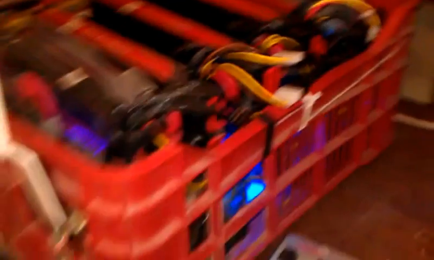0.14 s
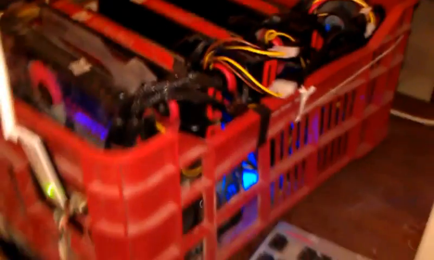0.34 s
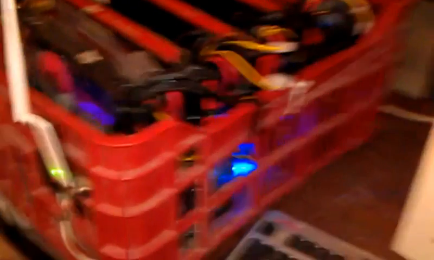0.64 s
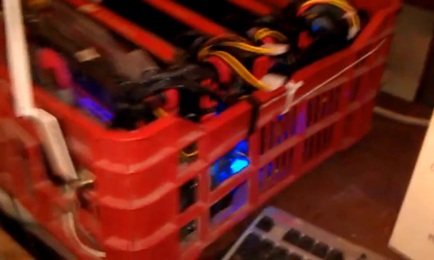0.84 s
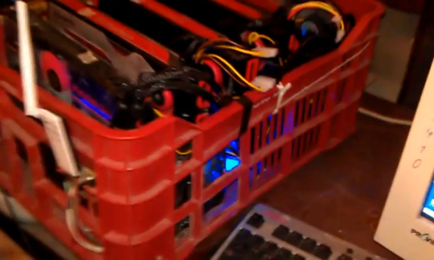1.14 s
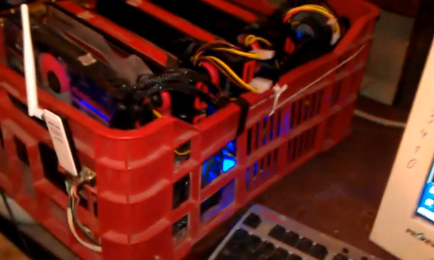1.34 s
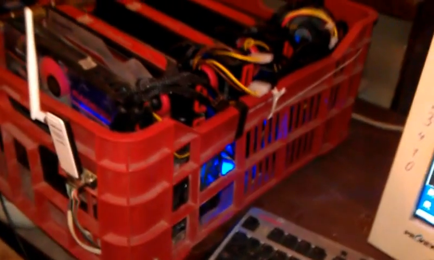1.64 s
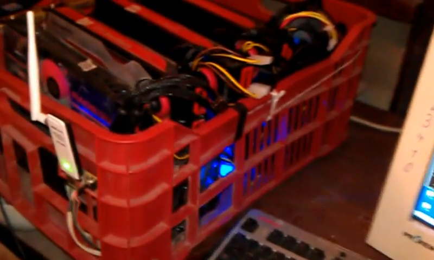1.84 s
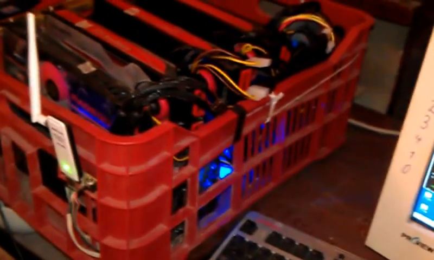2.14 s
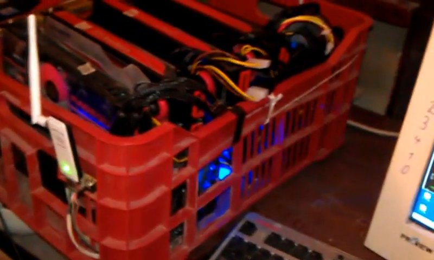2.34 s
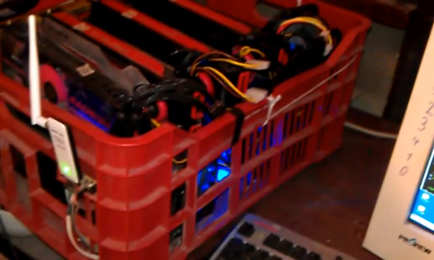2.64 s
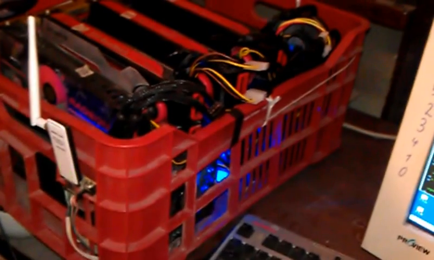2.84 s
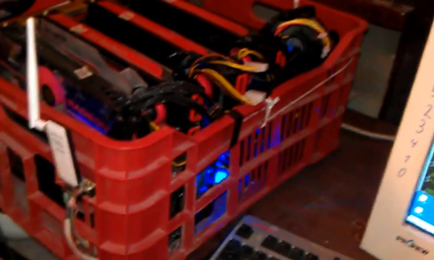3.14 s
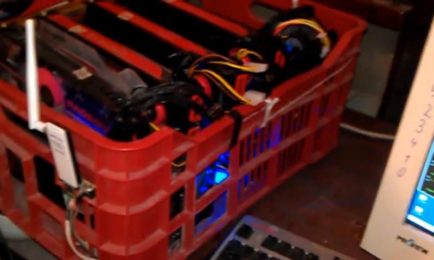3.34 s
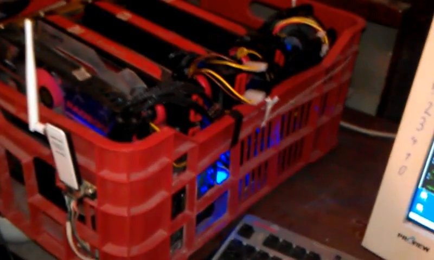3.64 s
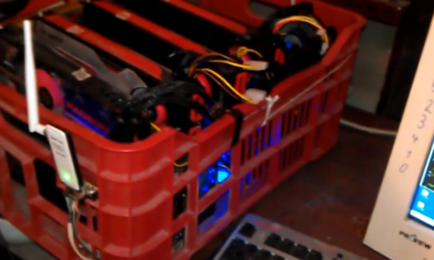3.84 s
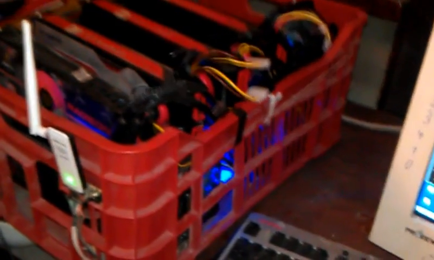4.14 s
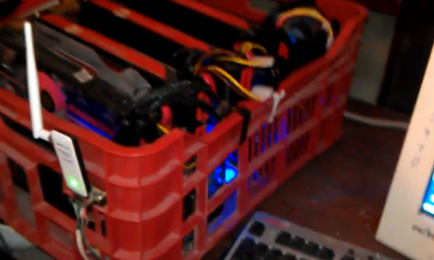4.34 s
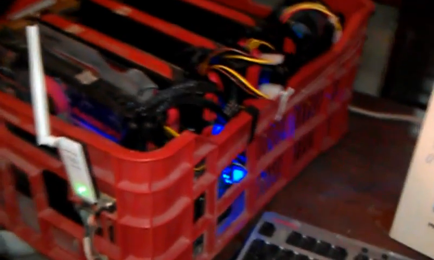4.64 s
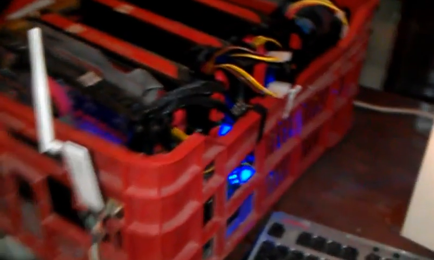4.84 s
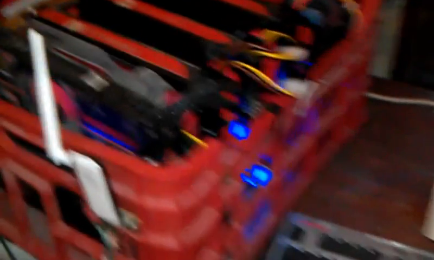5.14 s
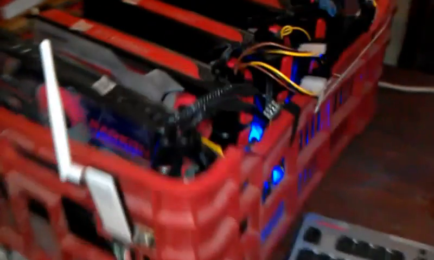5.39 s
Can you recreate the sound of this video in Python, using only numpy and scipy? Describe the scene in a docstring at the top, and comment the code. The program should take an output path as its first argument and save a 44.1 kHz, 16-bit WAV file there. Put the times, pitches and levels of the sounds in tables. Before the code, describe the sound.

A steady rush of computer fans with a faint hum, joined by a few brief handling scuffs and soft bumps.

```python
"""Small cooling fans blow flat out in an open plastic crate, heard on a hand-held camera's mono
microphone, its port ringing near 8.5 kHz. Close up at first, turbulent air makes an even whoosh over
faint wavering tones of blades and bearings, while the hand scuffs and bumps the camera body. By 1.5 s
the microphone is held back; from 3 s it turns and the whoosh changes colour. The hand scuffs and bumps
again at 4.6 s and brushes the body once more near the end."""
import sys
import numpy as np
from scipy import signal
from scipy.fft import rfft, irfft, next_fast_len
from scipy.io import wavfile
from scipy.ndimage import uniform_filter1d

SR = 44100
rng = np.random.default_rng(int(sys.argv[2]) if len(sys.argv) > 2 else 0)


def store_wav(level_fs):
    """Save 16-bit WAV to argv[1]."""
    pcm = np.round(np.clip(np.atleast_2d(level_fs), -1, 1) * 32767)
    wavfile.write(sys.argv[1], SR, pcm.T.astype(np.int16))


N = 243431


def gain_of(db):
    """Decibels to amplitude."""
    return 10 ** (np.asarray(db) / 20)


def unit_rms(x):
    """Scales to rms 1."""
    return x / np.sqrt(np.mean(x ** 2) + 1e-20)


def spectrum_at(hz, points_hz, values):
    """Interpolates a spectrum on a log-frequency axis."""
    return np.interp(np.log(hz + 1), np.log(np.asarray(points_hz) + 1), values)


def coloured(x, points):
    """Filters a sound by points of (frequency_hz, gain_db)."""
    size = next_fast_len(len(x))
    gain_db = spectrum_at(np.fft.rfftfreq(size, 1 / SR), *np.transpose(points))
    return irfft(rfft(x, size) * gain_of(gain_db), size)[..., :N]


def drift(t, low_hz, top_hz):
    """Random wavering of rms 1 at rates between low_hz and top_hz."""
    hz = np.geomspace(low_hz, top_hz, 24)[:, None]
    waves = np.sin(2 * np.pi * (hz * t + rng.random(hz.shape)))
    return unit_rms((waves / np.sqrt(hz)).sum(0))


def wander(low_hz, top_hz):
    """A drift drawn out to every sample."""
    t = np.arange(0, N / SR + .01, .005)
    return np.interp(np.arange(N) / SR, t, drift(t, low_hz, top_hz))


def microphone_shares(t):
    """Shares of the three microphone places as the camera moves before the crate."""
    # camera path: time_s, place (0 close, 1 held back, 2 turned)
    path = [(0, 0.027), (1.5, 0.97), (3, 0.97), (4.6, 1.32), (5.52, 1.78)]
    place = np.clip(np.interp(t, *np.transpose(path)), 0, 2)
    return np.maximum(1 - abs(place - np.arange(3)[:, None]), 0)


def whoosh():
    """Turbulent air from the fans; its colour follows the microphone's place."""
    # relative spectra shaped by crate and desk: frequency_hz, close_db, held_back_db, turned_db
    air_colour = [(40, -34, -32, -32), (100, -23, -21.5, -18), (190, -13, -17, -19), (224, -10, -13, -9.5),
                  (394, -1.5, -4, -5), (540, -8, -5, -9), (771, 8, 1.5, 7), (927, -11, -1, -3.5),
                  (1015, 3.5, -9.5, 2.5), (1200, 0, 0, 2.5), (1730, 4.5, -1, -1), (1900, 0.5, 0.5, -4),
                  (2710, -1.5, -5, -5), (4270, -7, -7.5, -7), (5400, -4.5, -7.5, -8)]
    frames, hz = N // 256 + 5, np.fft.rfftfreq(1024, 1 / SR)
    t = np.arange(frames) * 256 / SR
    points_hz, *places = np.transpose(air_colour)
    shape_db = np.transpose([spectrum_at(hz, points_hz, p) for p in places]) @ microphone_shares(t)
    real, imag, patches = rng.standard_normal((frames, 513, 3)).T
    patches = uniform_filter1d(patches, size=12, axis=0)  # smooth across frequency
    patches = unit_rms(uniform_filter1d(patches, size=12, axis=1))  # and across time
    gusts_db = .5 * drift(t, 2.5, 30.) * np.clip(hz / 5000, 0, 1)[:, None]  # eddies flicker together
    spectra = (real + 1j * imag) * gain_of(shape_db + 0.29 * patches + gusts_db)
    air = signal.istft(spectra, nperseg=1024, noverlap=768)[1][:N]
    return gain_of(-31) * unit_rms(air)


def blade_hums():
    """Each fan's blades pass at a nearly steady rate; the level wanders as when neighbours beat."""
    # blade-passing tones: pitch_hz, close_db, held_back_db, turned_db, wander_hz, wander_db
    hums = [(151, -69.5, -70.5, -69.5, .3, 3), (302, -53, -53.5, -52.5, 0.2, 0.5),
            (379.4, -58.5, -59, -67, 0.42, 3), (446.5, -47, -53, -45.5, .5, 1.5),
            (637, -59, -57.5, -49, 1.6, 1), (755, -48.5, -56, -61, 5.6, 3.5)]
    out, shares = np.zeros(N), microphone_shares(np.arange(N) / SR)
    for pitch_hz, *places_db, wander_hz, wander_db in hums:
        cycles = np.cumsum(pitch_hz + wander_hz * wander(1.5, 15.)) / SR + rng.random()
        level_db = places_db @ shares + wander_db * wander(2.5, 15.)
        out += np.sqrt(2) * gain_of(level_db) * np.sin(2 * np.pi * cycles)
    return out


def bearing_whines():
    """Thin wavering tones that come and go, each sinking slowly as its fan settles."""
    # bearing tones: start_hz, slide_hz_per_s
    pitches = [(3554, -3.6), (3454, -.5), (1875, -.5)]
    # each whine's level at the moving microphone, one curve each: time_s, level_db
    curves = [
        [(0, -55), (.62, -46.5), (.85, -63), (1.1, -56), (1.9, -62), (2.4, -56), (3.9, -56), (4.65, -51.5),
         (4.8, -66)],
        [(0, -66), (.7, -50), (1, -54), (1.3, -54), (2, -64), (4.1, -64), (4.5, -63), (5.52, -64)],
        [(0, -60), (2, -62), (2.6, -50), (3.4, -59), (4.1, -49), (4.45, -51), (4.7, -62)],
    ]
    t, out = np.arange(N) / SR, np.zeros(N)
    for (start_hz, slide_hz_per_s), curve in zip(pitches, curves):
        cycles = np.cumsum(start_hz + slide_hz_per_s * t + 3. * wander(1.5, 25.3)) / SR
        level_db = np.interp(t, *np.transpose(curve)) + 3.2 * wander(3., 25.)
        out += np.sqrt(2) * gain_of(level_db) * np.sin(2 * np.pi * cycles)
    return out


def skin_scuffs():
    """Skin slips densely and unevenly over the plastic body; each stroke swells and eases off."""
    # strokes of the hand: middle_s, length_s, level_db
    strokes = [(0, .2, -29), (0.27, 0.25, -22), (.63, .2, -25), (0.798, 0.14, -28), (4.615, 0.085, -23.5),
               (5.325, .18, -29.5)]
    # spectrum of the rubbing: frequency_hz, gain_db
    rub_colour = [(800, -28), (2200, 0.5), (4500, -12), (6000, -0.5), (7000, -5), (11000, -3.5), (15500, 7)]
    ends_db, flatness = -15.5, 2.5  # a stroke's ends against its middle; power that flattens its top
    t = np.arange(N) / SR
    slip_db = 0.79 * np.minimum(rng.exponential(1, N // 64 + 1), 3)
    slips = rng.standard_normal(N) * gain_of(np.repeat(slip_db, 64)[:N])
    pressure = sum(gain_of(level_db + ends_db * abs(2 * (t - middle_s) / length_s) ** flatness)
                   for middle_s, length_s, level_db in strokes)
    return pressure * unit_rms(coloured(slips, rub_colour))


def fingertip_ticks():
    """Sharp ticks within the scuffs that die in milliseconds."""
    # fingertip catches: start_s, strength_db
    ticks = [(.787, -22), (4.594, -32), (4.603, -23), (4.614, -16), (4.621, -18.5)]
    # spectrum of a tick: frequency_hz, gain_db
    tick_colour = [(1200, -15), (2300, -6), (3600, -2), (5000, -22), (7000, -3), (11000, 2), (15500, 12)]
    t, out, t60_s = np.arange(1500) / SR, np.zeros(N), 0.02
    for start_s, strength_db in ticks:
        burst = gain_of(strength_db - 60 * t / t60_s) * rng.standard_normal(len(t))
        out[round(start_s * SR):][:len(t)] += burst
    return coloured(out, tick_colour)


def handling():
    """The shifting grip sends lumpy rumble and dull bumps through the body to the microphone."""
    # jolts of the grip: peak_s, level_db
    jolts = [(.04, -60), (.284, -62), (.52, -63), (.82, -50), (.91, -57)]
    # soft bumps: start_s, level_db, pitch_hz, t60_s
    bumps = [(.805, -36.5, 120, 0.092), (.805, -34.5, 213, 0.077), (4.607, -38.5, 205, 0.1)]
    rise_db_per_s, fall_db_per_s = 400, 130
    rumble = coloured(rng.standard_normal(N), [(20, 8), (60, 3), (130, 1), (300, -40), (600, -80)])
    envelope = np.zeros(N)
    for peak_s, level_db in jolts:
        since_s = np.arange(N) / SR - peak_s
        envelope += gain_of(level_db + np.minimum(rise_db_per_s * since_s, -fall_db_per_s * since_s))
    out = envelope * unit_rms(rumble)
    t = np.arange(8000) / SR
    attack = 1 - np.exp(-t / .004)
    for start_s, level_db, pitch_hz, t60_s in bumps:
        ring = gain_of(level_db - 60 * t / t60_s) * np.sin(2 * np.pi * pitch_hz * t)
        out[round(start_s * SR):][:len(t)] += attack * ring
    return out


def draught():
    """Blown air buffets the microphone with faint low lumps."""
    rumble = coloured(rng.standard_normal(N), [(20, -1), (50, 0), (80, -11), (140, -22), (400, -80)])
    return gain_of(-73.5 + 8. * np.tanh(wander(1.43, 8.))) * unit_rms(rumble)


def room(x):
    """Bell-shaped peaks and dips where the small room's standing waves add or cancel."""
    # standing waves: centre_hz, width_hz, gain_db
    modes = [(183, 9.9, -3.5), (225, 25, 3), (288, 30, -2), (410, 16, 2.5), (435, 13, -2.5), (514, 10, 3.5),
             (543, 43, -1.5), (597, 13, 1), (647, 15, -4), (708, 37, 2), (828, 25, -2.5), (887, 18, 3.5),
             (1856, 49, 2), (1966, 30, -2)]
    size = next_fast_len(N)
    hz = np.fft.rfftfreq(size, 1 / SR)
    gain_db = sum(db * np.exp(-((hz - centre_hz) / width_hz) ** 2) for centre_hz, width_hz, db in modes)
    return irfft(rfft(x, size) * gain_of(gain_db), size)[:N]


def scene():
    """Fans and hand at one microphone, which feeds both channels."""
    fans = room(whoosh()) + blade_hums() + bearing_whines() + draught()
    mono = fans + skin_scuffs() + fingertip_ticks() + handling()
    return np.array([mono, mono])


def record(dry):
    """The microphone's bass cut, port resonance and treble loss, then the band limit."""
    # microphone response: frequency_hz, gain_db
    response = [(20, -12), (100, 1), (4500, 3.5), (6500, 3.5), (7500, 7), (8100, 12.5), (8450, 14.5),
                (9200, 8.5), (10000, 1.5), (11000, -5), (13500, -10.5), (15000, -18.5), (15700, -20)]
    edge_hz = 15760
    heard = np.array([coloured(channel, response) for channel in dry])
    lowpass = signal.firwin(1023, edge_hz, window=("kaiser", 10), fs=SR)
    return signal.oaconvolve(heard, lowpass[None], "same")


dry = scene()
out = record(dry)
store_wav(out)
```